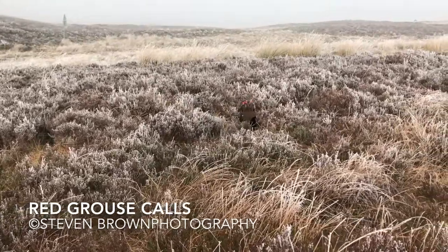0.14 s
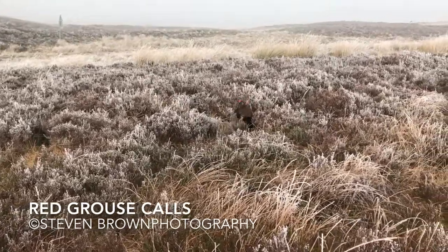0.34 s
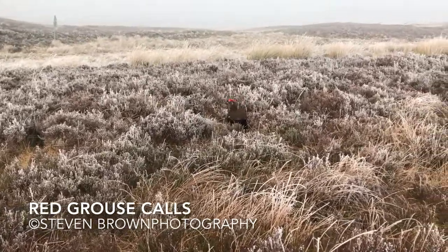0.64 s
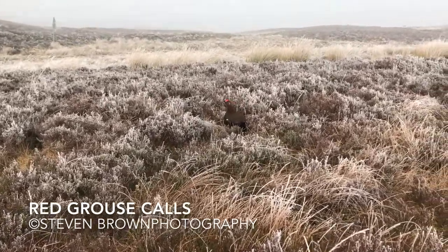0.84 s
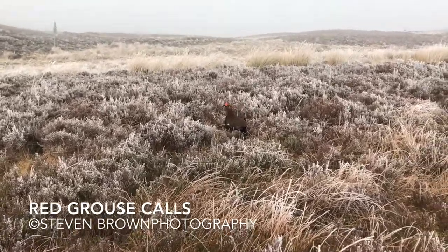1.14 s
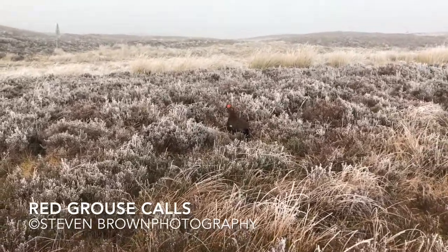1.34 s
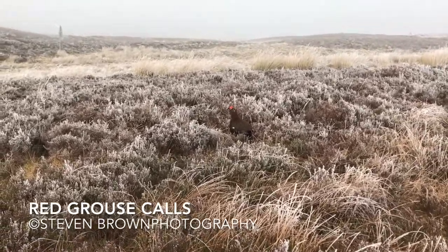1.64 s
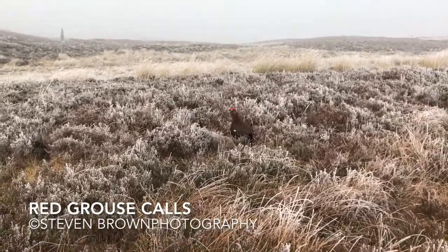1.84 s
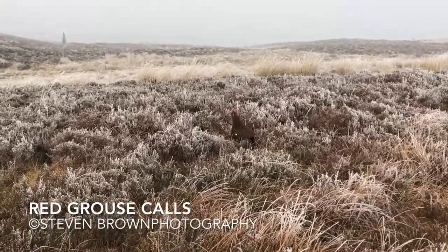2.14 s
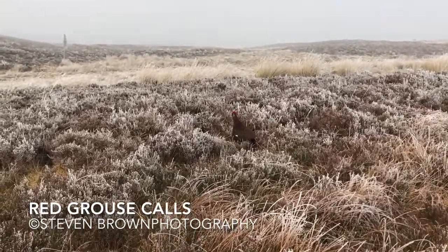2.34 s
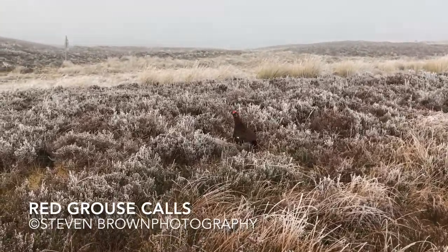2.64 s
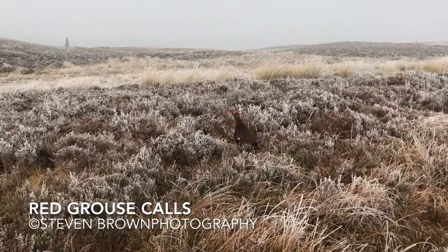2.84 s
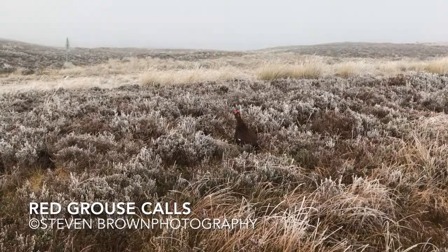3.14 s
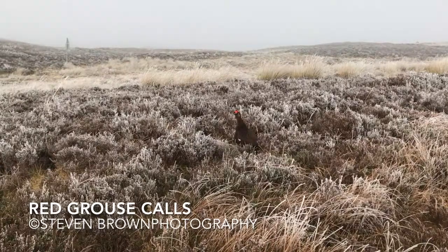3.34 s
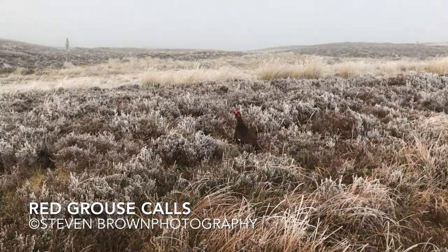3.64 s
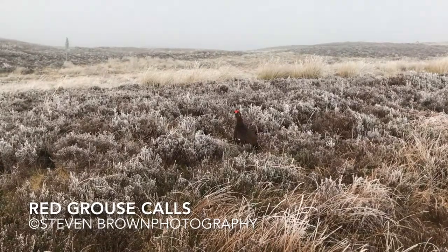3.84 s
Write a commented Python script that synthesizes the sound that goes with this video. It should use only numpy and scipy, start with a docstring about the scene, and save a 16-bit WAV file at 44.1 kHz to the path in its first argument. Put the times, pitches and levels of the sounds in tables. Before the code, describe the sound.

Harsh grouse croaks quicken into a fading rattle over faint wind and distant calls.

```python
"""A red grouse calls from the heather: single croaks, each trailed by a low growl, speed up into a
rattle and fade. Every note is a few throat pulses ringing through resonances (pitches that the
throat boosts), which shift as the call builds. A second grouse answers far across the moor,
and wind nudges the microphone over a faint hiss."""
import sys
import numpy as np
from scipy import signal
from scipy.fft import rfft, irfft
from scipy.io import wavfile
from scipy.ndimage import uniform_filter1d, map_coordinates

SR = 44100
rng = np.random.default_rng(int(sys.argv[2]) if len(sys.argv) > 2 else 0)


def wrap_up_sound(samples):
    """Save the sound to the file named by the first command line argument, as 16-bit audio."""
    columns = np.atleast_2d(samples).T
    # keep every value between -1 and 1, then stretch to whole-number steps
    tamed = np.clip(columns, -1, 1)
    steps = np.round(tamed * 32767).astype(np.int16)
    wavfile.write(sys.argv[1], SR, steps)


N = 176400
TIME = np.arange(N) / SR
PULSE_SAMPLES = 2048
HZ = np.fft.rfftfreq(PULSE_SAMPLES, 1 / SR)

# Tone of the steady hiss and of the rustles: frequency_hz, gain_db
HISS_TONE = [(150, -0.5), (450, -12.5), (800, -15.5), (1400, -19), (2100, -22.5), (6000, -27), (15500, -31)]
RUSTLE_TONE = [(800, -11), (3000, -7), (15000, -7)]
# Soft rustles and wind gusts: middle_s, half_length_s, level_db
RUSTLES = [(0.044, 0.025, -72), (0.486, 0.048, -77), (.68, 0.062, -78.5)]
GUSTS = [(0, 0.015, -52.5), (.14, 0.098, -48), (1.07, 0.038, -45.5), (2.87, 0.017, -60.5),
         (3.23, 0.022, -59.5), (3.7, 0.1, -47.5)]
# Tone of the wind's rumble and of the swirling air in a puff: frequency_hz, gain_db
RUMBLE_TONE = [(20, -6.5), (38, -12), (58, 6), (150, -13), (250, -26.5), (400, -45), (1600, -120)]
SWIRL_TONE = [(100, -7.5), (370, 7.5), (500, -15), (900, -53)]
# Sharp puffs on the microphone: middle_s, level_db, pitch_hz, fade_s
PUFFS = [(0.248, -59, 224, 0.0032), (1.064, -40, 192, 0.0032), (3.581, -46, 176, 0.0033),
         (3.73, -39, 201, 0.0056), (3.76, -30.5, 173, 0.0026), (3.817, -37, 57.4, 0.0044)]

# The far bird's notes: middle_s, length_s, level_db
FAR_NOTES = [(0.047, 0.034, -70), (.148, 0.018, -66), (0.214, 0.017, -65.5), (0.28, 0.026, -65.5),
             (0.359, 0.027, -61), (0.451, 0.037, -63), (.582, 0.066, -63.5), (0.747, 0.043, -60),
             (1.168, 0.055, -67.5), (1.467, 0.069, -64.5), (1.772, 0.071, -63.5), (2.056, 0.071, -66),
             (2.609, 0.11, -68.5), (3.605, 0.13, -75.5), (3.963, 0.14, -65.5)]
# Its two resonances, the low one set against the high: time_s, high_hz, low_gain_db
FAR_THROAT = [(0, 2000, 6.5), (.75, 2300, 6), (1.2, 2230, -6.5), (3.6, 2070, 3)]

# The near bird's croaks, timed from the first full pulse: start_s, level_db, pitch_hz, closes_after_s
CROAKS = [(.34, -52, 122.5, 0.039), (0.924, -36.5, 135.4, 0.03), (1.3472, -31, 149.9, 0.018),
          (1.6692, -28.5, 160, 0.02), (1.935, -26.5, 169.8, 0.022), (2.1505, -25, 186.3, 0.025),
          (2.3057, -26, 172.5, .025), (2.4284, -28, 174.2, .025), (2.5378, -28.5, 184.5, .026),
          (2.64, -29.5, 178, 0.027), (2.7354, -29, 177.4, 0.028), (2.8236, -28.5, 184.2, 0.024),
          (2.9034, -28.5, 186.7, 0.026), (2.9765, -28, 189.5, 0.023), (3.046, -27.5, 193.3, 0.018),
          (3.1124, -27, 188.2, 0.017), (3.176, -28, 186.4, 0.018), (3.234, -30.5, 183, 0.02),
          (3.291, -34, 176.3, .014), (3.3462, -39, 176.3, 0.013), (3.4, -40.5, 167, 0.0051),
          (3.454, -42.5, 165.7, 0.0044), (3.5075, -52.5, 177, 0), (3.5602, -48.5, 156, 0.003),
          (3.6124, -53.5, 174, 0), (3.665, -51, 185, 0), (3.7242, -52, 192, 0.00088)]
# The soft pulse that opens a croak, set against that croak: time_s, gain_db
OPENING_PULSE = [(.9, -12), (2.15, -6.5), (2.3, -13), (2.85, -9.5), (3.4, -12.5)]
# How long a croak is pressed before the throat goes slack: time_s, hold_s
PRESS_TIMES = [(2.5, 0.012), (2.9, 0.0097)]
# Throat resonances: width_hz, slack_pitch_ratio, slack_gain_db, track of (time_s, centre_hz, gain_db)
THROAT_RESONANCES = [(140.4, 0.818, -1, [(.9, 720, 1.5), (2.15, 896, 5.5), (2.6, 850, 2.5),
                     (3.5, 805, 3.5)]), (169, 0.93, -1.5, [(.9, 1123, 3.5), (2.1, 1226, 0),
                     (2.65, 1433, -3), (3.2, 1260, -9.5)]), (141, 1, -1.5, [(.9, 1910, -34),
                     (2.45, 1970, -24), (2.98, 1830, -1.5), (3.23, 1870, -0.5), (3.6, 1960, -20.5)]),
                     (157, 0.976, -7.5, [(.9, 2770, -25), (2.15, 3280, -13.5), (2.43, 3005, -16.5),
                     (2.56, 2640, -13), (2.83, 2480, -8.5), (3.13, 2227, -5), (3.6, 2220, -22.5)]),
                     (217, 1.04, -15, [(1.4, 3500, -52), (2.2, 3730, -24), (3.15, 3880, -23),
                     (3.4, 3670, -51)])]
# The whistling top resonance, before it sweeps up in each note: time_s, centre_hz, gain_db
WHISTLE_TRACK = [(.9, 4500, -48), (1.5, 4330, -24.5), (2.2, 5300, -59), (2.5, 3820, -28), (2.85, 4380, -28),
                 (3.13, 5120, -25), (3.4, 5000, -44)]
# Tone of a pulse's broad body and of the breath in it: frequency_hz, gain_db
CHEST_TONE = [(60, -45.5), (330, -15.5), (480, -28.5), (1500, -87), (6500, -69), (8500, -55.5),
              (15000, -56)]
BREATH_TONE = [(500, -56), (1500, 12.5), (4000, -1), (7500, -12), (15000, -16)]
# Growls, one curve each: time_s, relative_level_db, pitch_hz
GROWLS = [
    [(.378, -72.5, 115.8), (.402, -54, 116.9), (.435, -63.5, 112), (.468, -56.5, 111.3),
     (.51, -64.5, 109.8), (.55, -59, 108.8), (.62, -62.5, 104.8), (.715, -69, 93.5)],
    [(.962, -71, 114.7), (.98, -52.5, 115), (.998, -49.5, 112), (1.025, -56.5, 107.2), (1.09, -59, 106.2),
     (1.152, -61, 95)],
    [(1.385, -64, 111), (1.423, -51, 107), (1.452, -66.5, 102.9), (1.495, -60, 99.4)],
    [(1.705, -56, 137.3), (1.735, -53, 133.7), (1.792, -75, 127.4)],
    [(1.978, -52.5, 114), (2.005, -50.5, 107), (2.04, -72, 104)],
    [(2.19, -53, 103.7), (2.25, -69, 97.6)],
]
# Resonances of a growl: centre_hz, width_hz, gain_db
GROWL_RESONANCES = [(676, 100, 1.5), (907, 160, -9), (1088, 174, -2)]

CREST_S = .009  # a croak's pitch peaks this long after its first full pulse


def amp(db):
    """Turn decibels into a gain."""
    return 10 ** (np.asarray(db) / 20)


def values_at(curve, time_s):
    """Read a curve's columns at one moment, blending between its rows."""
    times, *columns = np.transpose(curve)
    return [np.interp(time_s, times, column) for column in columns]


def tone_gain(tone, hz):
    """Read a tone table's gain at these frequencies, on a log scale."""
    frequencies, db = np.transpose(tone)
    return amp(np.interp(np.log(hz + 1), np.log(frequencies), db))


def noise(tone):
    """Noise with this tone and an average power of 1."""
    white = rfft(rng.standard_normal(N))
    shaped = irfft(white * tone_gain(tone, np.fft.rfftfreq(N, 1 / SR)), N)
    return shaped / np.sqrt(np.mean(shaped ** 2) + 1e-20)


def swells(rows):
    """A gain that rises and falls in a bell shape for each row."""
    return sum(amp(db) * np.exp(-((TIME - middle_s) / half_s) ** 2 / 2) for middle_s, half_s, db in rows)


def air(hiss_db=-72):
    """A steady hiss and a few soft rustles."""
    return amp(hiss_db) * noise(HISS_TONE) + swells(RUSTLES) * noise(RUSTLE_TONE)


def wind(breeze_db=-67, flutter_db=4, flutters_per_s=16, swirl_db=-12):
    """A light breeze and its gusts rumble on the microphone, with a few sharp puffs."""
    flutter = map_coordinates(rng.standard_normal(200), [TIME * flutters_per_s])
    out = (amp(breeze_db) + swells(GUSTS)) * amp(flutter_db * flutter) * noise(RUMBLE_TONE)
    swirl = amp(swirl_db) * noise(SWIRL_TONE)
    for middle_s, db, hz, fade_s in PUFFS:
        offset_s = TIME - middle_s
        envelope = amp(db) * np.exp(.5 - np.hypot(offset_s / fade_s, .5))
        swirl_share = min(hz / 183, 1) ** 2  # puffs below 183 Hz swirl less
        out += envelope * (swirl * swirl_share - np.cos(2 * np.pi * hz * offset_s))
    return out


def resonance(centre_hz, width_hz, db):
    """A steep-sided peak that boosts the frequencies near its centre."""
    return amp(db) / (1 + ((HZ - centre_hz) / width_hz) ** 2) ** 1.37


def add_pulse(out, start_s, peak_db, spectrum):
    """Add one throat pulse that rings with this spectrum."""
    # Folding the cepstrum (minimum phase) makes the pulse start sharply, then ring out.
    cepstrum = irfft(np.log(spectrum + 1e-6))
    cepstrum[1:PULSE_SAMPLES // 2] *= 2
    cepstrum[PULSE_SAMPLES // 2 + 1:] = 0
    ring = irfft(np.exp(rfft(cepstrum)))
    slot = out[max(0, round(start_s * SR)):][:PULSE_SAMPLES]
    slot += (amp(peak_db) * ring / np.abs(ring).max())[:len(slot)]


def heather_echo(sound, decay_s):
    """A blurred echo off the heather that falls 60 dB in decay_s, with a new tail each quarter second."""
    t = np.arange(SR // 2) / SR
    out, block = np.zeros(N + SR), SR // 4
    for i in range(0, N, block):
        tail = rng.standard_normal(len(t)) * np.exp(-np.log(1000) * t / decay_s)
        echo = signal.fftconvolve(sound[i:i + block], tail / np.linalg.norm(tail))
        out[i:i + len(echo)] += echo
    return out[:N]


def far_bird(pulse_hz=400, jitter_s=.00025, arch_hz=315, edge_drop_db=15, slowing_per_s=1.4):
    """Uneven pulses make rough, nasal notes that rise and fall, blurred by distance."""
    out = np.zeros(N)
    offsets_s = np.arange(-36, 37) / pulse_hz
    for middle_s, length_s, db in FAR_NOTES:
        high_hz, low_db = values_at(FAR_THROAT, middle_s)
        low = resonance(centre_hz=785, width_hz=153, db=low_db)
        for offset_s, slip_s in zip(offsets_s, rng.normal(0, jitter_s, len(offsets_s))):
            edge = (2 * offset_s / length_s) ** 2  # 0 in mid-note, 1 half a length away
            if edge < 2:
                high = resonance(high_hz - arch_hz * edge, width_hz=243, db=0)
                start_s = middle_s + offset_s + slowing_per_s * offset_s ** 2 + slip_s
                add_pulse(out, start_s, db - edge_drop_db * edge, high + low)
    return out + amp(-4) * heather_echo(out, decay_s=.05)


def whistle(start_s, age_s, rise_s=.013, rise_hz_per_s=46600, rise_db_per_s=200, top_hz=5540):
    """The near bird's top resonance sweeps up and grows as each note opens."""
    hz, db = values_at(WHISTLE_TRACK, start_s)
    open_s = min(age_s, rise_s)
    centre_hz = min(hz + rise_hz_per_s * open_s, top_hz)
    return resonance(centre_hz, width_hz=240, db=db + rise_db_per_s * open_s)


def throat(start_s, age_s, slack=0, wander=.028, yelp_per_s=12.8, brighten_s=.012, brighten_db_per_s=422):
    """The spectrum of one pulse, age_s into a croak, heard low over the ground."""
    shifts = 1 + wander * rng.standard_normal(len(THROAT_RESONANCES))
    shifts[1] *= 1 + yelp_per_s * (min(age_s, CREST_S) - CREST_S / 2)  # the second resonance sweeps up
    peaks = []
    for shift, (width_hz, slack_ratio, slack_db, track) in zip(shifts, THROAT_RESONANCES):
        hz, db = values_at(track, start_s)
        peaks.append(resonance(hz * shift * slack_ratio ** slack, width_hz, db + slack_db * slack))
    bright_db = brighten_db_per_s * (min(age_s, brighten_s) - brighten_s / 2)
    bright_db -= 15 * (age_s < 0)  # the opening pulses are dull
    ground_dip = 1 - .51 * np.exp(-((HZ - 499) / 230) ** 2)  # the bounce off the ground weakens this band
    lows = ground_dip * sum(peaks[:2])
    highs = amp(bright_db) * (sum(peaks[2:]) + whistle(start_s, age_s))
    return lows + highs + tone_gain(CHEST_TONE, HZ)


def croaks(slacken_s=.0016, slack_drop_db=8, ebb_db_per_s=327, close_db_per_s=1504, pitch_sag=.28):
    """Two soft opening pulses, then pressed ones, then slack, deeper ones until the throat closes."""
    out = np.zeros(N)
    for start_s, db, hz, closes_after_s in CROAKS:
        hold_s, = values_at(PRESS_TIMES, start_s)
        opening_db, = values_at(OPENING_PULSE, start_s)
        gap_s = 1.13 / hz
        add_pulse(out, start_s - 2 * gap_s, db + 2 * opening_db - 14, throat(start_s, -gap_s))
        add_pulse(out, start_s - gap_s, db + opening_db, throat(start_s, -gap_s))
        age_s = 0
        for _ in range(6):
            slack = .5 + .5 * np.tanh((age_s - hold_s) / slacken_s)  # 0 pressed, 1 slack
            fade_db = slack_drop_db * slack + ebb_db_per_s * max(0, age_s - hold_s)
            fade_db += close_db_per_s * max(0, age_s - closes_after_s)
            add_pulse(out, start_s + age_s, db - fade_db, throat(start_s, age_s, slack))
            off_crest = min(((age_s - CREST_S) / .02) ** 2, 1.5)
            age_s += (1 + pitch_sag * off_crest) / hz  # pulses come slower away from the crest
    return out


def growls(jitter=.05, boost_db=2):
    """After the early croaks the slack throat ticks on: dull, quiet and slowing down."""
    out = np.zeros(N)
    spectrum = sum(resonance(*row) for row in GROWL_RESONANCES) + tone_gain(CHEST_TONE, HZ)
    for curve in GROWLS:
        time_s, end_s = curve[0][0], curve[-1][0]
        while time_s < end_s:
            db, hz = values_at(curve, time_s)
            add_pulse(out, time_s, db + boost_db, spectrum)
            time_s += np.exp(jitter * rng.standard_normal()) / hz
    return out


def near_bird(breath_db=-26, smoothing_s=.0017):
    """Croaks and growls with breath noise in every pulse, a short echo and a faint, longer one."""
    voice = croaks() + growls()
    airflow = np.sqrt(np.abs(uniform_filter1d(voice ** 2, round(smoothing_s * SR))))
    voice += amp(breath_db) * airflow * noise(BREATH_TONE)
    close_echo = amp(-8) * heather_echo(voice, decay_s=.035)
    moor_echo = amp(-37) * heather_echo(voice, decay_s=.51)
    return voice + close_echo + moor_echo


def scene():
    """Both birds on the windy moor, in one channel."""
    return (near_bird() + far_bird() + wind() + air())[None]


def record(dry):
    """Cut away the very highest treble."""
    top_hz = 15750
    return irfft(rfft(dry) * (np.fft.rfftfreq(N, 1 / SR) < top_hz), N)


dry = scene()
out = record(dry)
wrap_up_sound(out)
```